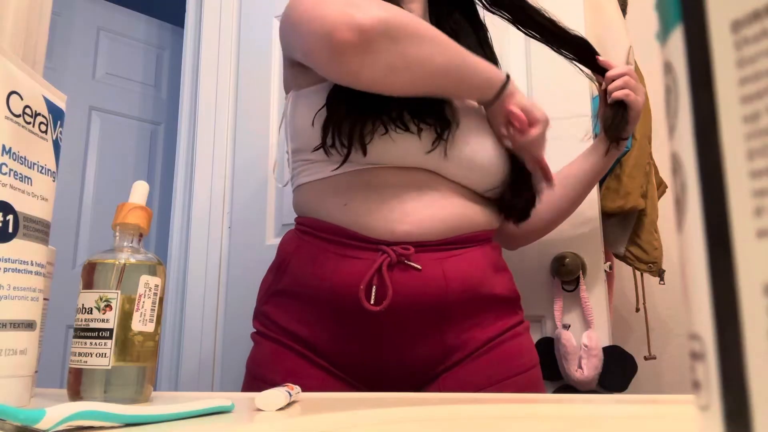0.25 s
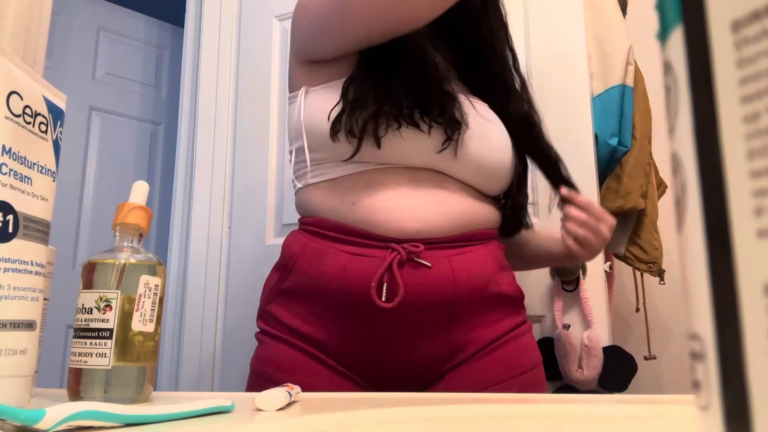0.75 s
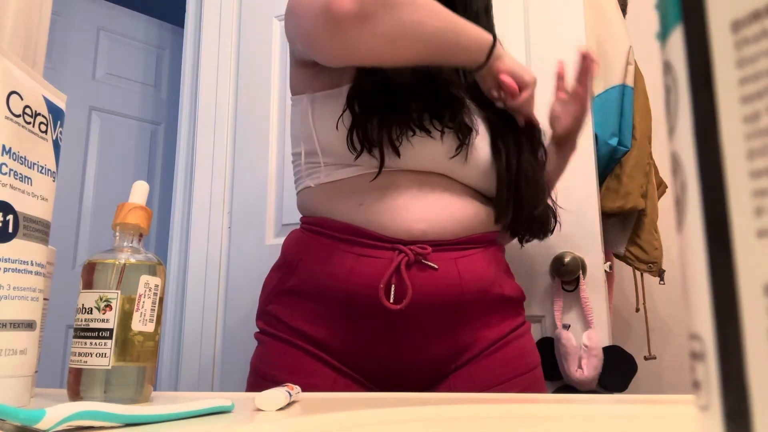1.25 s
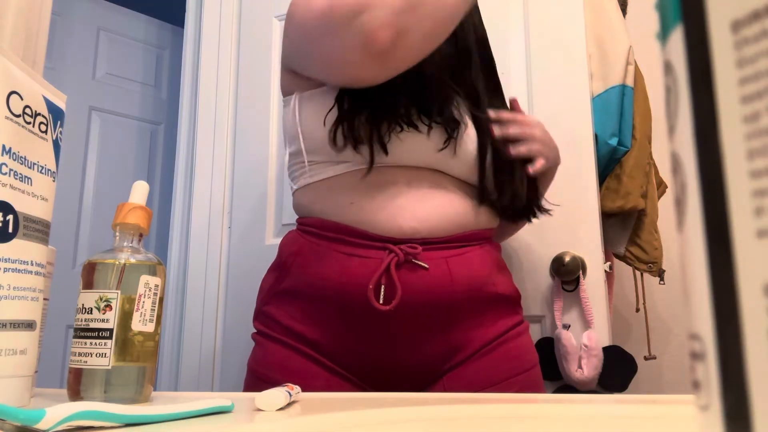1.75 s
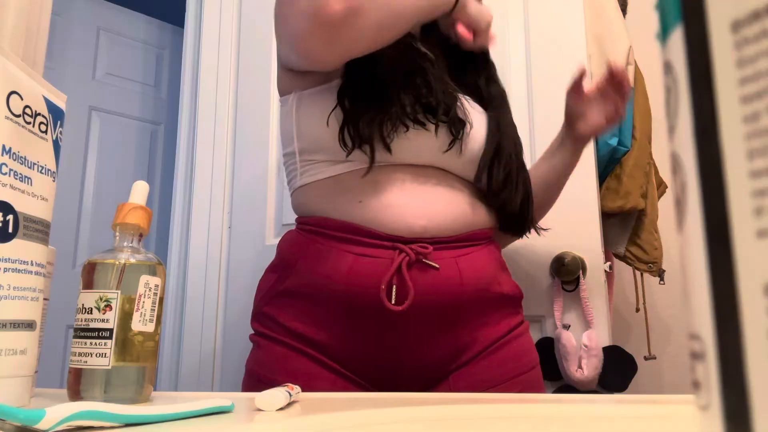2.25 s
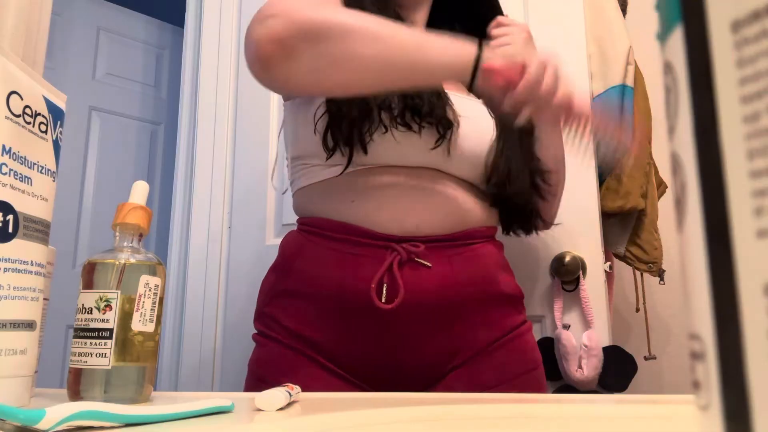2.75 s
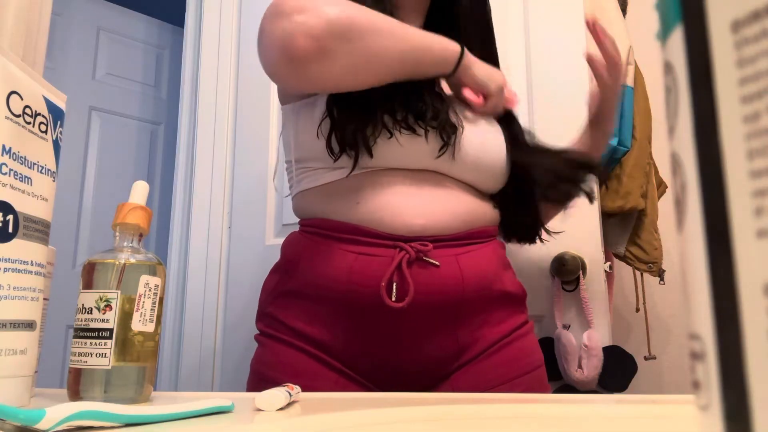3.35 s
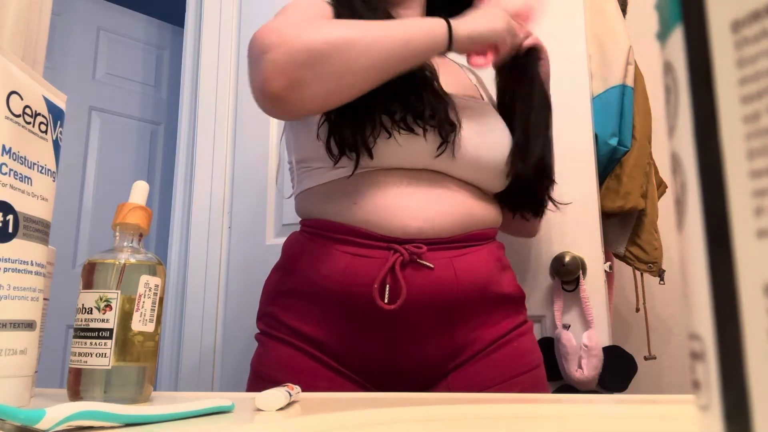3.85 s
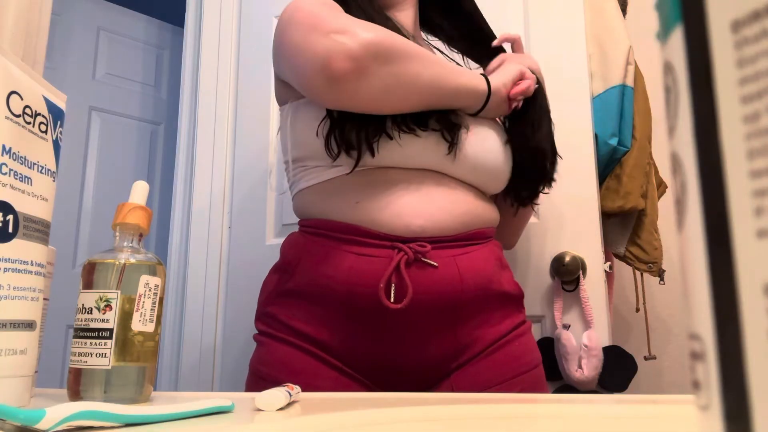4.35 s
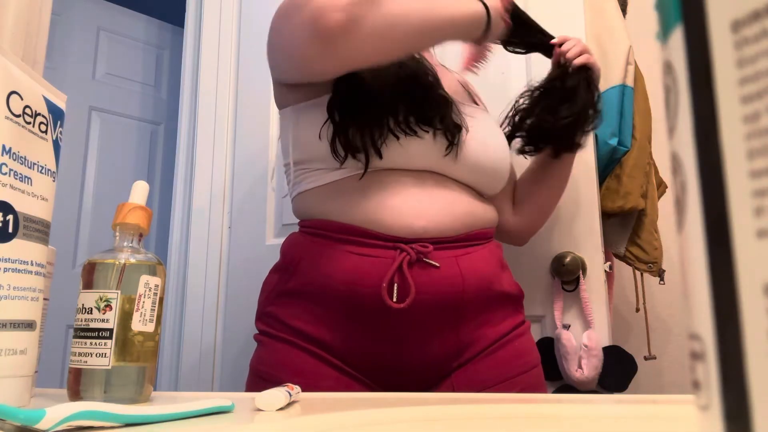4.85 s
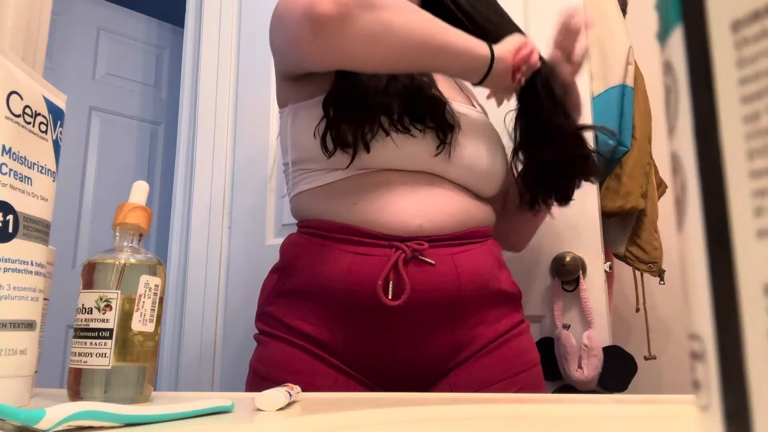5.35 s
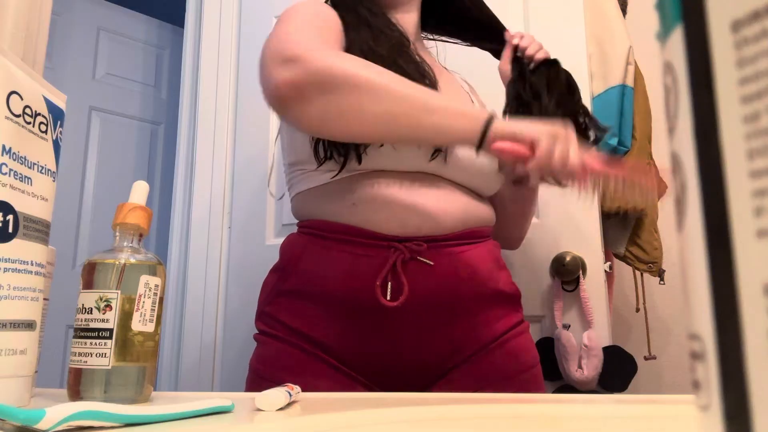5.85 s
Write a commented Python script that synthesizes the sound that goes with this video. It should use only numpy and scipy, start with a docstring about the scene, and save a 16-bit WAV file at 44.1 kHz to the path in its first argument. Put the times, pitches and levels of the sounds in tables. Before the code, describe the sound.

A brush drags through long hair in uneven, scratchy, hissing strokes with sharp snaps and small knocks, over a low throbbing drone.

```python
"""A paddle brush is pulled through long hair in uneven strokes in a small bathroom.
Stick-slip friction makes strands hiss and bristles scratch; bristles flick free and rattle the hollow
paddle, tangles snap as stored tension is released, and the brush swings out through the air.
Behind it are a mains hum and a far engine, perhaps a propeller plane: a sum of sine orders whose drone
sinks slowly and beats against the hum. Reflections and a two-port microphone spread the sound."""
import sys
import numpy as np
from scipy import signal
from scipy.fft import rfft, irfft, next_fast_len
from scipy.io import wavfile

SR = 44100
rng = np.random.default_rng(int(sys.argv[2]) if len(sys.argv) > 2 else 0)


def wrap_up_sound(samples):
    """Save the sound to the file named by the first command line argument, as 16-bit audio."""
    columns = np.atleast_2d(samples).T
    # keep every value between -1 and 1, then stretch to whole-number steps
    tamed = np.clip(columns, -1, 1)
    steps = np.round(tamed * 32767).astype(np.int16)
    wavfile.write(sys.argv[1], SR, steps)


N = 269892
TIME = np.arange(N) / SR
SIZE = next_fast_len(N + SR // 2, True)   # transform length, with room for the reverberant tail
FREQS = np.maximum(np.arange(SIZE // 2 + 1) * SR / SIZE, 1)

# pulls of the brush: (start [s], length [s], nominal sliding hiss [dB], nominal bristle scratch [dB])
STROKE_ROWS = [(0.112, 0.18, -51.5, -66), (0.834, 0.64, -56.5, -65), (1.967, 0.61, -55.5, -64.5),
               (2.972, 0.6, -56, -65.5), (4.018, 0.33, -63, -71.5), (4.326, 0.23, -58, -72.5),
               (4.965, 0.25, -61, -72), (5.362, 0.33, -60.5, -67), (6.013, 0.08, -49, -55)]
# radiation spectrum of the hollow paddle: (frequency [Hz], relative density [dB per Hz])
PADDLE_SPECTRUM = [(120, 1.5), (250, 0.5), (450, 1.5), (750, 2), (950, -1.5), (1250, 1), (1450, -2.5),
                   (1700, -10), (2500, -16), (6000, -51.5)]
# spectrum of a sharp crack: (frequency [Hz], relative density [dB per Hz])
CRACK_SPECTRUM = [(700, -22), (2500, -11), (4200, -7), (6000, -3), (8000, 0), (11000, -2), (14000, -3),
                  (15800, -2)]


def from_db(db):
    """Logarithmic level: decibels to amplitude gain."""
    return 10 ** (np.asarray(db) / 20)


def rms_one(x):
    """Normalisation of power: scale to rms 1."""
    return x / np.sqrt(np.mean(x ** 2) + 1e-20)


def in_time(rows):
    """Linear interpolation: a curve's value at every sample."""
    return np.interp(TIME, *np.transpose(rows))


def over_hz(points):
    """Interpolation on a logarithmic frequency axis: a table's value at every frequency."""
    hz, value = np.transpose(points)
    return np.interp(np.log(FREQS), np.log(hz), value)


def drift(rate):
    """Low-pass random process: noise through two equal poles at the given rate in Hz; rms 1."""
    step = 40   # samples between the computed values
    r = np.exp(-2 * np.pi * step * rate / SR)
    white = rng.standard_normal(N // step + 2002)
    slow = signal.lfilter([1], [1, -2 * r, r * r], white)[2000:]   # drop the filter's onset
    return np.interp(np.arange(N) / step, np.arange(len(slow)), rms_one(slow))


def colour(x, points):
    """Minimum-phase filtering: causal, of the given shape, keeping the power of white noise."""
    cepstrum = irfft(np.log(rms_one(from_db(over_hz(points)))), SIZE)
    # fold the cepstrum onto positive time
    cepstrum[1:SIZE // 2] *= 2
    cepstrum[SIZE // 2 + 1:] = 0
    response = np.exp(rfft(cepstrum))
    return irfft(rfft(x, SIZE) * response, SIZE)[..., :N]


def narrow_ring(hz, width):
    """Narrow-band noise: two quadrature carriers with slow random amplitudes."""
    turn = 2 * np.pi * np.cumsum(hz * np.ones(N)) / SR
    return drift(width) * np.cos(turn) + drift(width) * np.sin(turn)


def mode(pushes, hz, t60):
    """Damped modal oscillator: a unit push sets a sine of initial height 1 ringing."""
    r, w = from_db(-60 / (t60 * SR)), 2 * np.pi * hz / SR
    return signal.lfilter([0, np.sin(w)], [1, -2 * r * np.cos(w), r * r], pushes + 1e-18)


def flicks(per_s, spread_db, smooth):
    """Stick-slip friction: random slips of uneven size over a share of smooth noise; rms 1."""
    signs = rng.choice([-1, 1], N)
    sizes = from_db(spread_db * np.minimum(rng.exponential(1, N), 4)) * signs
    slips = rms_one(sizes * (rng.random(N) < per_s / SR))
    return rms_one(slips + smooth * rng.standard_normal(N))


def bursts(times, levels_db, decay_s, hz=None):
    """Impulsive release: decaying noise, broad or resonant at a pitch; the level sets its energy."""
    out, age = np.zeros(N + SR), TIME[:SR // 20]
    shape = np.exp(-age / decay_s)
    for k, (s, db) in enumerate(zip(times, levels_db)):
        burst = rng.standard_normal(len(age)) * shape
        if hz is not None:
            burst = signal.lfilter(*signal.iirpeak(hz[k], 3.5, fs=SR), burst)
        same_energy = np.sqrt(np.sum(shape ** 2) / np.sum(burst ** 2))
        first = int(s * SR)
        out[first:first + len(age)] += from_db(db) * burst * same_energy
    return out[:N]


def swell(s, half_s, db):
    """Gaussian envelope: a smooth rise and fall around one moment."""
    return from_db(db) * np.exp(-((TIME - s) / half_s) ** 2)


def background():
    """Filtered noise: low rumble, faint steady humming tones and faint air noise."""
    # rumble spectrum: (frequency [Hz], relative density [dB per Hz])
    rumble_spectrum = [(20, -21), (35, -25.5), (50, -4), (66, 3.5), (80, -6.5), (95, -7), (122, 0),
                       (150, -7.5), (200, -16.5), (330, -22.5), (450, -20.5), (620, -19), (850, -31),
                       (1300, -49)]
    # air-noise spectrum: (frequency [Hz], relative density [dB per Hz])
    air_spectrum = [(300, -2.5), (1000, -4), (1400, -0.5), (1600, -12), (2200, -15.5), (4000, -17),
                    (7000, -23), (9500, -19.5), (12500, -25), (15800, -28)]
    # faint steady humming tones, each a narrow band of noise: (frequency [Hz], width [Hz], level [dB])
    tone_rows = [(331, 7, -76), (635, 9, -74.5)]
    wall = signal.butter(4, 1400, fs=SR, output="sos")
    rumble = signal.sosfilt(wall, colour(rng.standard_normal(N), rumble_spectrum)) * from_db(-52.5)
    tones = sum(from_db(db) * narrow_ring(hz, width / 2) for hz, width, db in tone_rows)
    air = from_db(-76.5) * colour(rng.standard_normal(N), air_spectrum)
    return rumble + tones + air


def hums():
    """Periodic sources: the steady mains hum and the low rising note of a second far motor."""
    # second motor speeding up: (time [s], frequency [Hz], rms level [dB])
    motor_rows = [(2.0, 62.8, -66), (2.3, 64.3, -67), (2.7, 67, -51), (3.05, 72.9, -66),
                  (3.35, 78.7, -51.5), (3.902, 82, -74)]
    mains_hz, mains_db = 119.95, -54.5   # close to the engine's second order, so the two beat
    s, motor_hz, motor_db = np.transpose(motor_rows)
    turn = 2 * np.pi * np.cumsum(np.interp(TIME, s, motor_hz)) / SR
    motor = from_db(np.interp(TIME, s, motor_db)) * np.sin(turn)
    mains = from_db(mains_db) * np.sin(2 * np.pi * mains_hz * TIME)
    return np.sqrt(2) * (mains + motor)


def overtones():
    """Frequency modulation: thin tones of the drone come and go, wavering a little in pitch."""
    # swelling tones: (centre time [s], half length [s], peak level [dB], frequency [Hz])
    tone_rows = [(0.6, 0.3, -63, 431), (0.68, 0.13, -54, 517), (0.95, 0.5, -68, 560), (1.0, 0.09, -60, 260),
                 (1.1, 0.6, -67, 323), (1.3, 0.25, -60, 515), (2.0, 0.15, -65, 422), (2.55, 0.3, -61, 250),
                 (3.25, 0.15, -66, 515), (3.8, 0.1, -59, 331), (4.85, 0.25, -64, 517),
                 (5.65, 0.4, -59, 516)]
    waver_hz = 1.2 * drift(2)
    out = 0
    for s, half_s, db, hz in tone_rows:
        turn = 2 * np.pi * np.cumsum(hz + waver_hz) / SR
        out = out + swell(s, half_s, db) * np.sin(turn)
    return np.sqrt(2) * out


def engine():
    """Harmonic synthesis: engine orders through the walls; the second meets a room mode and swells."""
    # firing rate: (time [s], frequency [Hz])
    rate_curve = [(0, 67.06), (0.6, 65.03), (1.3, 64.38), (2.1, 63.82), (2.9, 62.09), (3.7, 61.64),
                  (4.5, 60.48), (5.3, 59.11), (6.12, 60.04)]
    # second order: (time [s], rms level [dB])
    second_order_curve = [(0, -57.5), (0.25, -54.5), (0.55, -45.5), (0.87, -42), (1.1, -54.5),
                          (1.45, -62.5), (2.2, -59), (2.8, -53), (3.1, -57.5), (3.3, -46), (3.9, -52.5),
                          (4.6, -50), (4.9, -43.5), (5.15, -46.5), (5.4, -56), (5.66, -40.5), (6.0, -56),
                          (6.12, -45)]
    # weaker orders: (multiple of the firing rate, level before the gains below [dB])
    order_rows = [(1, -64.5), (3, -83), (4, -69), (5, -76.5), (6, -76)]
    # gain of the weaker orders, which swells and dips and is lower near the end: (time [s], gain [dB])
    order_gain_curve = [(0, 1.5), (1, 2.5), (1.8, 0.5), (2.6, 7.5), (3.1, -0.5), (4.2, 2), (5, -9.5),
                        (6.12, -3.5)]
    turn = 2 * np.pi * np.cumsum(in_time(rate_curve)) / SR
    boom = from_db(in_time(second_order_curve)) * np.sin(2 * turn)
    orders = 0
    for k, db in order_rows:
        fading = 1 + 0.64 * drift(4.4)
        phase = 2 * np.pi * rng.random()
        orders = orders + from_db(db) * fading * np.sin(round(k) * turn + phase)
    return np.sqrt(2) * (boom + orders * from_db(in_time(order_gain_curve)))


def handling():
    """Band-limited friction: hand, arm and brush rub over hair and cloth, soft and grainy."""
    # rubs: (centre time [s], half length [s], peak level [dB], centre frequency [Hz])
    rub_rows = [(0.217, 0.06, -60.5, 2300), (0.505, 0.039, -80, 1900), (0.74, .08, -77, 650),
                (1.71, 0.012, -87, 800), (1.92, 0.017, -82, 900), (2.902, 0.071, -81, 970),
                (3.73, 0.05, -77, 2150), (3.92, .07, -86, 1980), (4.633, 0.03, -79, 2200),
                (4.827, 0.049, -82, 1000), (4.904, 0.022, -70, 5200), (5.865, 0.044, -78.5, 2000)]
    grains = flicks(per_s=260, spread_db=3.5, smooth=.4)
    out = 0
    for s, half_s, db, hz in rub_rows:
        octave = [hz / np.sqrt(2), hz * np.sqrt(2)]
        band = signal.butter(2, octave, "band", fs=SR, output="sos")
        out = out + swell(s, half_s, db) * rms_one(signal.sosfilt(band, grains))
    return out


def swings():
    """Turbulent flow noise: air rushes through the bristles as the brush swings free of the hair."""
    # swings out of a tangle or stroke, or back for the next: (centre time [s], half length [s], level [dB])
    swing_rows = [(0.49, 0.16, -57.5), (0.757, 0.13, -78), (1.583, 0.19, -60.5), (2.915, 0.094, -74),
                  (3.794, 0.11, -61.5), (4.174, 0.012, -61), (4.595, 0.17, -57.5), (5.298, 0.081, -66.5),
                  (5.865, 0.11, -57.5)]
    # rush of air: (frequency [Hz], relative density [dB per Hz])
    swish_spectrum = [(150, -23.5), (280, 0.5), (360, 7), (560, 1.5), (800, -7), (1400, -16), (1650, -19),
                      (2000, -17.5), (2800, -43.5), (5000, -47)]
    strength = sum(swell(*row) for row in swing_rows)
    return strength * colour(rng.standard_normal(N), swish_spectrum)


def bumps():
    """Modal excitation: the paddle bumps the hand or body; the place struck decides which modes answer."""
    # blows: (time [s], level [dB], place along the paddle [0-1])
    blow_rows = [(0.228, -40.5, 0.64), (1.4617, -44.5, 0.68), (2.233, -48, .8), (3.401, -44, 0.18),
                 (3.4265, -35, 0.83), (4.1026, -49, 0.6), (4.18, -46, 0.34), (5.4135, -43, .6),
                 (5.7113, -55, 0.4)]
    # modes: (frequency [Hz], relative level [dB], t60 [s], liveliest place along the paddle [0-1])
    mode_rows = [(826, -14.5, 0.036, 0.1), (1010, 2, 0.034, 0.17), (1255, 2, 0.025, 0.61),
                 (1320, -2.5, 0.022, 0.98)]
    miss_db = 33   # loss of a mode struck a whole paddle length from its liveliest place
    s, bump_db, place = np.transpose(blow_rows)
    out = 0
    for hz, db, t60, liveliest in mode_rows:
        pushes = np.zeros(N)
        pushes[(s * SR).astype(int)] = from_db(bump_db + db - miss_db * np.abs(place - liveliest))
        out = out + mode(pushes, hz, t60)
    return out


def mirror(x):
    """Specular reflection: mirror and tiles in line with both ports trail each sharp sound with echoes."""
    first_s, echo_db, t60_s = 0.0019, -7, 0.22
    age = TIME[:SR // 4]
    echoes = rng.standard_normal(len(age)) * from_db(-60 * age / t60_s) * (age > first_s)
    echoes /= np.sqrt(np.sum(echoes ** 2))
    return x + from_db(echo_db) * signal.fftconvolve(x, echoes)[:N]


def snaps():
    """Release of elastic energy: a caught bristle cracks free, rings, twangs others and jolts the paddle."""
    # bristles leaving tangles, levels before the mix gains below:
    # (time [s], tick [dB], twang [dB], paddle knock [dB], tick pitch [Hz])
    snap_rows = [(0.227, -59, -51, -37.5, 6900), (0.9258, -67, -49, -74, 7400),
                 (1.065, -49, -66, -64, 8100), (1.082, -50, -66, -62, 8300), (1.2947, -63, -43, -50, 7420),
                 (1.4607, -45, -66, -40, 10800), (2.0109, -38, -67, -73, 7750),
                 (2.021, -47, -75, -75, 7440), (2.0405, -54, -75, -75, 7200), (2.3436, -46, -38, -55, 7120),
                 (2.426, -56, -41, -66, 7600), (2.7782, -67, -66, -83, 4940), (3.326, -62, -49, -58, 7470),
                 (3.3325, -43.5, -59, -66, 7900), (3.3496, -49, -44, -66, 7820),
                 (3.3876, -54, -48, -64, 7700), (3.3987, -56, -41.5, -52, 7700),
                 (3.4274, -53, -46, -58, 7910), (3.483, -48, -64, -60, 6900),
                 (3.719, -57.5, -60, -64, 7570), (4.026, -54, -56, -80, 6140),
                 (4.1022, -41, -37.5, -47, 7850), (4.1639, -49, -40, -39, 7500),
                 (4.178, -40, -32.5, -37, 8000), (4.1843, -33, -39.5, -39, 10500),
                 (4.1911, -34, -52, -62, 11200), (4.195, -37, -50, -58, 11400),
                 (4.3347, -31.5, -52, -71, 8900), (4.578, -70, -53, -46, 7860),
                 (4.663, -70, -66, -75, 6500), (4.8903, -48.5, -77, -70, 8300),
                 (5.375, -48, -50.5, -65, 6820), (5.4114, -44, -49, -48, 7400),
                 (5.4378, -44, -43, -47, 7400), (5.4811, -41, -36, -42, 6500),
                 (5.497, -40.5, -50, -61, 6700), (5.5498, -49.5, -43, -58, 6270),
                 (5.7105, -40.5, -45, -57, 7400), (5.859, -83, -67, -54, 6500),
                 (6.024, -39, -48, -36, 8240), (6.0445, -35, -45, -52, 7900), (6.057, -46, -52, -50, 7800)]
    # twang of neighbouring bristles: (frequency [Hz], relative density [dB per Hz])
    twang_spectrum = [(700, 0.5), (1400, 3), (2000, -0.5), (3000, 0), (4200, -6), (6000, -5), (9000, -20)]
    s, tick_db, twang_db, knock_db, tick_hz = np.transpose(snap_rows)
    release = bursts(s, tick_db, decay_s=0.001)
    crack = colour(release, CRACK_SPECTRUM) * from_db(3.0)
    tick = bursts(s, tick_db, decay_s=0.002, hz=tick_hz) * from_db(-0.5)
    twang = colour(bursts(s, twang_db, decay_s=0.0018), twang_spectrum)
    knock = colour(bursts(s, knock_db, decay_s=0.0022), PADDLE_SPECTRUM) * from_db(-6.0)
    return mirror(crack + tick) + twang + knock


def crackle(hiss_gain):
    """Nonlinear growth: harder pulls crack single hairs free, in a sound growing faster than the hiss."""
    tension = (hiss_gain / from_db(-50)) ** 2.25
    cracks = flicks(per_s=450, spread_db=3, smooth=.2)
    return colour(cracks, CRACK_SPECTRUM) * tension * from_db(-56.0)


def pull(start, length, db, attack_s, release_db_per_s, curve=0.48):
    """Envelope of a driven contact: power-law attack, hold and exponential release of one stroke."""
    age = TIME - start
    attack = np.clip(age / attack_s, 0, 1) ** curve
    return attack * from_db(db - release_db_per_s * np.maximum(age - length, 0))


def friction():
    """Addition of powers: even strokes and tangles set the gains of hiss, scratch, ring and rasp."""
    # loose hair gathered by the hand: (centre time [s], half length [s], level [dB])
    rustle_rows = [(1.78, 0.058, -86.5), (3.77, 0.1, -74), (4.006, 0.082, -71.5), (4.918, 0.033, -66.5),
                   (5, 0.021, -69), (5.34, 0.081, -66), (5.97, 0.12, -79.5)]
    # drag through tangles, nominal levels:
    # (centre time [s], half length [s], hiss [dB], scratch [dB], bristle ring [dB], paddle rasp [dB])
    tangle_rows = [(0.195, 0.056, -57.5, -54, -60, -54.5), (0.267, 0.038, -55, -60, -78, -62.5),
                   (0.943, 0.057, -49, -62, -60.5, -62.5), (1.203, 0.15, -59.5, -66, -70, -70.5),
                   (1.403, 0.055, -54.5, -60.5, -71, -62), (1.455, 0.019, -55, -90, -85, -81),
                   (2.134, 0.057, -51.5, -61.5, -65, -62.5), (2.231, 0.011, -54, -73, -75, -56.5),
                   (2.333, 0.032, -53, -72, -59, -59), (2.39, 0.034, -52, -70, -59, -64.5),
                   (2.565, 0.057, -51, -64, -81, -62), (3.1, 0.045, -53, -69, -71, -87),
                   (3.295, 0.025, -70, -76, -80, -60), (3.336, 0.028, -52.5, -67, -55.5, -56.5),
                   (3.395, 0.015, -58, -67, -50.5, -57.5), (3.533, 0.077, -52, -64, -69, -63),
                   (4.11, 0.036, -57, -65, -62, -73), (4.176, 0.028, -50, -55.5, -61, -55.5),
                   (4.205, 0.015, -46.5, -68, -75, -77), (4.425, 0.042, -50.5, -67, -67, -64.5),
                   (4.521, 0.012, -50, -77, -67, -74), (5.115, 0.093, -55.5, -67.5, -78, -66.5),
                   (5.461, 0.047, -54, -61, -80, -56), (5.59, 0.083, -66, -70, -80, -72),
                   (5.696, 0.032, -51.5, -65.5, -77, -57.5)]
    touch_s, sink_in_s = 0.11, 0.14   # the bristles touch the hair, then sink in
    hiss_release, scratch_release = 284, 389   # dB per s as the bristles leave the hair
    rustle_scratch_db = -12   # strands scratch on each other, relative to their rustle
    ring_db, rasp_db = -5.5, -0.5   # relative to the strokes' scratch gain
    rustle = sum(swell(*row) for row in rustle_rows)
    slide = sum(pull(s, length, db, touch_s, hiss_release) for s, length, db, _ in STROKE_ROWS)
    dig = sum(pull(s, length, db, sink_in_s, scratch_release) for s, length, _, db in STROKE_ROWS)
    scratch = dig + rustle * from_db(rustle_scratch_db)
    even = [slide + rustle, scratch, dig * from_db(ring_db), dig * from_db(rasp_db)]
    tangled = sum(swell(s, half_s, np.array(levels_db)[:, None])
                  for s, half_s, *levels_db in tangle_rows)
    return np.hypot(even, tangled)


def stroke_age():
    """Contact time: seconds since the latest stroke began, negative before the first."""
    starts = np.array(STROKE_ROWS)[:, 0]
    return TIME - starts[np.maximum(np.searchsorted(starts, TIME) - 1, 0)]


def plucks():
    """Plucked resonators: bristles catch single hairs, each ringing at one of 14 pitches; rms 1."""
    per_s, ring_cycles = 85, 10   # plucks per second; cycles until a ring is down 60 dB
    pitches = np.geomspace(1500, 6000, 14)
    signs = rng.choice([-1, 1], N)
    sizes = from_db(4 * np.minimum(rng.exponential(1, N), 3)) * signs
    caught = sizes * (rng.random(N) < per_s / SR)
    dealt = rng.integers(0, len(pitches), N)   # which pitch each pluck takes
    return rms_one(sum(rms_one(mode(caught * (dealt == k), hz, ring_cycles / hz))
                       for k, hz in enumerate(pitches)))


def brushing(hiss_gain, scratch_gain, ring_gain, rasp_gain):
    """Stick-slip excitation: strands hiss past bristles, which scratch, ring and shake the paddle."""
    # sliding strands: (frequency [Hz], relative density [dB per Hz])
    hiss_spectrum = [(1500, -30), (3500, -16.5), (5000, -11.5), (6300, -7), (7500, -2), (8900, 0),
                     (10200, -3.3), (11500, -6.5), (13500, -10.5), (15800, -14.5)]
    # scraping bristles: (frequency [Hz], relative density [dB per Hz])
    scratch_spectrum = [(900, -6), (1600, 3.5), (2100, 0.5), (2500, -4), (3300, -5), (4200, 1.5),
                        (5500, -0.5), (8000, -35.5), (14000, -33.5)]
    catch = drift(45)   # hair catches and slips, jolting scratch, ring and rasp together
    strands = flicks(per_s=1700, spread_db=1.0, smooth=1.5)
    hiss = colour(strands, hiss_spectrum) * from_db(-1.5 + 1.0 * drift(31.8))
    scrapes = colour(flicks(per_s=420, spread_db=4.6, smooth=.5), scratch_spectrum)
    scratch = (scrapes * from_db(-1.0) + plucks() * from_db(-1.5)) * from_db(0.21 * catch)
    # the ring sinks by 700 Hz per second as the bristle bends through the stroke
    ring_hz = 3197 - 700 * stroke_age()
    ring = narrow_ring(ring_hz, width=320) * from_db(2.0 * catch)
    jolts = flicks(per_s=260, spread_db=2.8, smooth=.5) * from_db(1.6 * catch)
    rasp = colour(jolts, PADDLE_SPECTRUM) * from_db(4.5)
    return hiss * hiss_gain + scratch * scratch_gain + ring * ring_gain + rasp * rasp_gain


def bathroom(x, count=8):
    """Reverberation: a short tail whose pattern of reflections keeps changing at a fixed rate."""
    low_t60_s, treble_t60_s, treble_from_hz = .205, .32, 6500
    patterns_per_s = 40   # rate at which one pattern of reflections follows another
    age, places = TIME[:SR // 2], np.arange(count)[:, None]
    white = rng.standard_normal((count, 2, len(age)))
    tails = 0
    for band, t60 in (("low", low_t60_s), ("high", treble_t60_s)):
        split = signal.butter(3, treble_from_hz, band, fs=SR, output="sos")
        tails = tails + signal.sosfilt(split, white) * from_db(-60 * age / t60) / np.sqrt(t60)
    tails = (age > .003) * tails
    tails /= np.sqrt(np.sum(tails ** 2, axis=2, keepdims=True))
    # the sound passes from one set of reflections to the next at constant power
    away = np.abs((patterns_per_s * TIME - places + 1) % count - 1)
    nearness = np.cos(np.pi / 2 * np.minimum(away, 1))
    spectra = rfft(nearness * x, SIZE)[:, None] * rfft(tails, SIZE)
    return irfft(np.sum(spectra, axis=0), SIZE)[:, :N]


def ports(common, diffuse):
    """Partial coherence: a common sound, phase-shifted between two ports, joins one differing at each."""
    # microphone pair: (frequency [Hz], phase by which left leads [rad])
    phase_curve = [(200, 0), (600, -1.4), (850, -3.4), (1150, -6.3), (1400, -6.7), (1750, -9.4),
                   (2000, -10.2), (2300, -12.9), (2900, -14.7), (3800, -18.5), (5000, -15.5), (6300, -13.1),
                   (7200, -12.4), (8000, -11.4), (9100, -9.6), (9800, -9.3), (10500, -8.3), (11200, -6.4),
                   (12600, -6.1), (13500, -3.7), (14400, -3.1), (16000, -1.5)]
    # microphone pair: (frequency [Hz], left-right level difference [dB])
    balance_curve = [(150, 2), (330, 5), (520, -2), (900, 1), (1350, 4.5), (2100, 2), (2900, 4), (3700, 0),
                     (5000, 0), (6300, -2.5), (8500, 0)]
    # (frequency [Hz], power share of the sound common to both channels [0-1])
    common_share_curve = [(170, 0.91), (400, 0.43), (750, 0.2), (1250, 0.45), (2900, 0.23), (4500, 0.2),
                          (5800, 0.27), (7000, 0.65), (8300, 0.97), (9200, 1), (9900, 0.92), (10600, 0.74),
                          (12000, 0.94), (15000, 1)]
    share, sides = np.clip(over_hz(common_share_curve), 0, 1), np.array([[.5], [-.5]])
    shifted = rfft(common, SIZE) * np.exp(1j * sides * over_hz(phase_curve))
    both = np.sqrt(share) * shifted + np.sqrt(1 - share) * rfft(diffuse, SIZE)
    return irfft(both * from_db(sides * over_hz(balance_curve)), SIZE)[:, :N]


def scene():
    """Superposition: brush in the room; the background arrives partly as one wave, partly all round."""
    hiss, scratch, ring, rasp = friction()
    brush = brushing(hiss, scratch, ring, rasp) + crackle(hiss) + snaps()
    brush = brush + bumps() + swings() + handling()
    all_round = np.array([background(), background()])
    common = brush + engine() + overtones() + hums() + background()
    return ports(common, bathroom(brush) + all_round)


def record(dry):
    """Band limiting: an elliptic low-pass cuts steeply above 16 kHz."""
    return signal.sosfilt(signal.ellip(10, .1, 80, 16000, fs=SR, output="sos"), dry)


dry = scene()
out = record(dry)
wrap_up_sound(out)
```